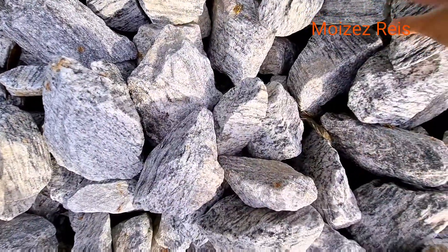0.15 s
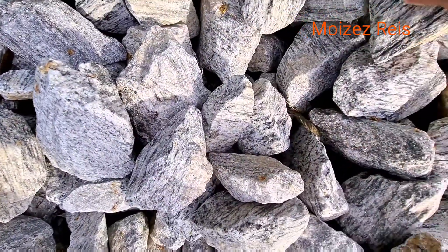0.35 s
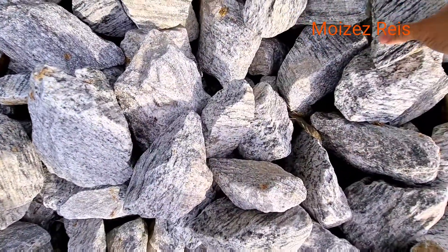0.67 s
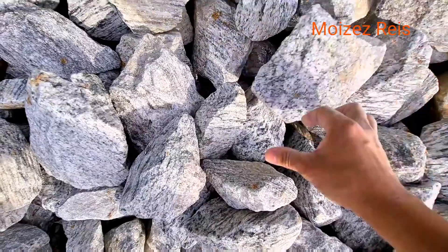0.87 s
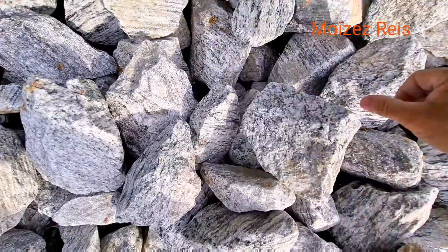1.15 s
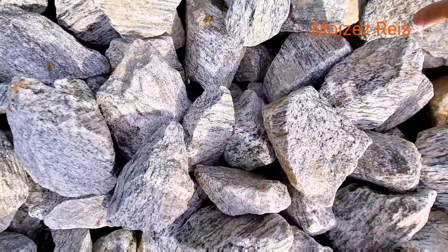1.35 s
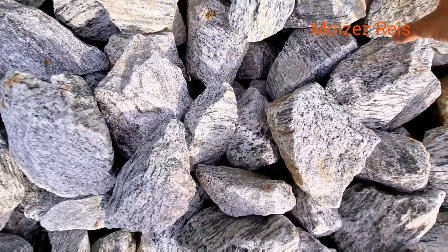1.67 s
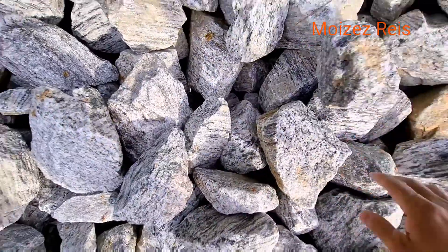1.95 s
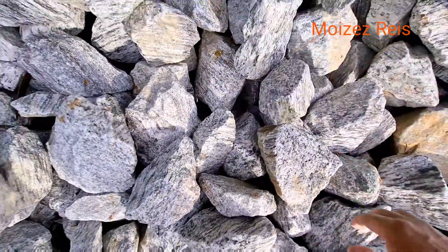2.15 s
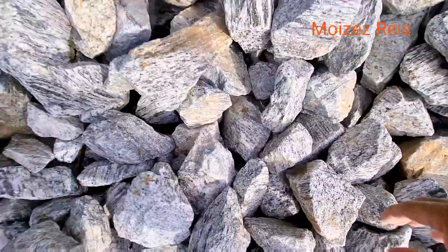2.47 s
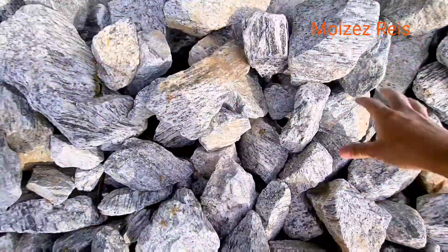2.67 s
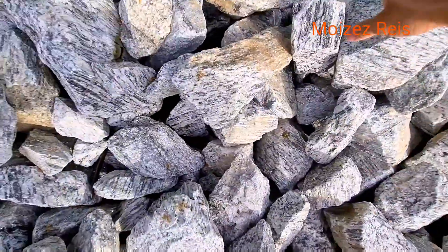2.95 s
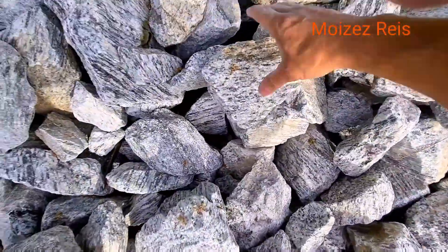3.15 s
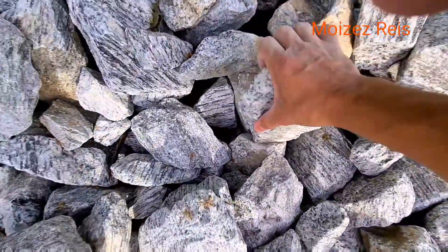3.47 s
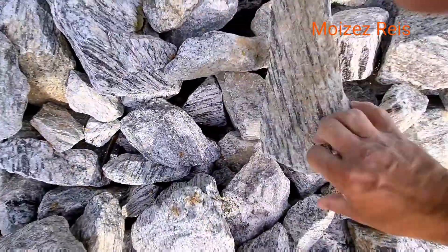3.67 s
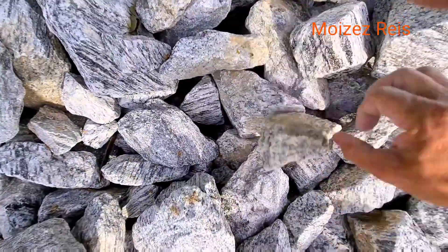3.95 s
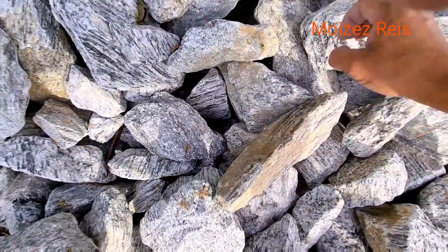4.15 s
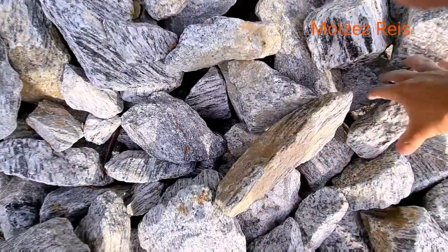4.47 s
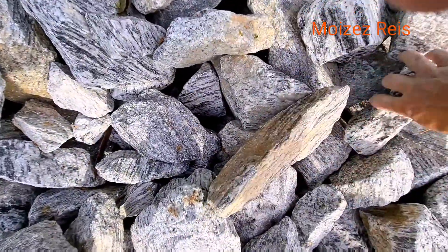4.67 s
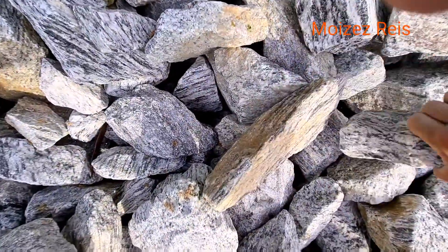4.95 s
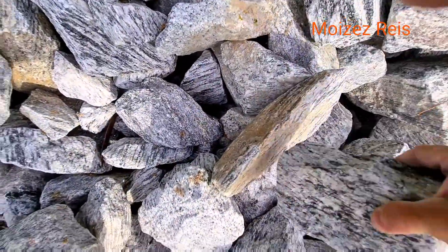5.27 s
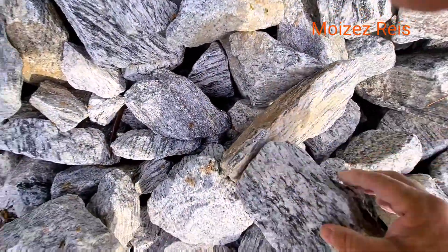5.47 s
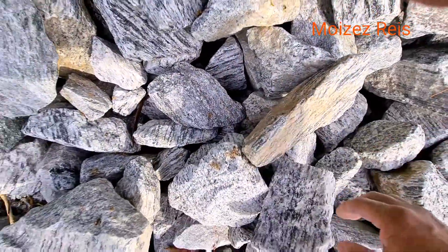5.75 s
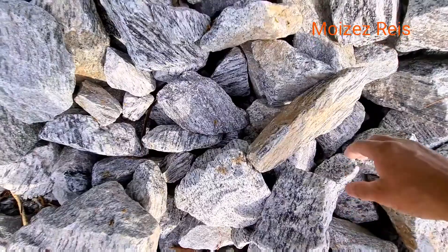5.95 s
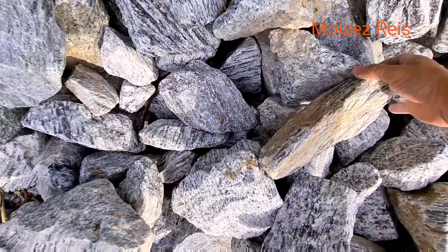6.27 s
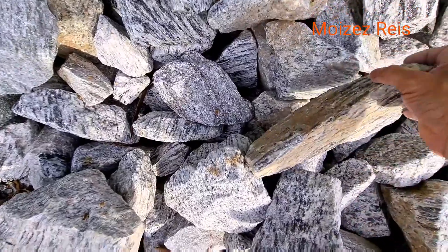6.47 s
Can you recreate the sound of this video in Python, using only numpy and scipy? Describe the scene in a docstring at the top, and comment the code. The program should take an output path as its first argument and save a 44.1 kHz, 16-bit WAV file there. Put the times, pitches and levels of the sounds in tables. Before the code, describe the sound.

Rough stones knock, clink and scrape against each other in irregular bursts as they are handled on a heap outdoors.

```python
"""Outdoors at a stone heap, close under a phone: hands turn and drop rough building stones.
Each blow is a short contact pulse with chatter after it. Sliding faces grind and grit crackles.
The handled stone rings in its own high modes; the heap adds hollow resonances and a low thump.
Light wind rumble, a faint insect band and a far dove fill the pauses."""
import sys
import numpy as np
from scipy import signal
from scipy.fft import rfft, irfft, next_fast_len
from scipy.io import wavfile
from scipy.ndimage import uniform_filter1d

SR = 44100
rng = np.random.default_rng(int(sys.argv[2]) if len(sys.argv) > 2 else 0)


def generate_wav(sig):
    """Save sig (samples, or channels by samples) to the path in sys.argv[1] as 16-bit PCM at SR."""
    pcm = np.round(np.clip(np.atleast_2d(sig).T, -1, 1) * 32767).astype(np.int16)
    wavfile.write(sys.argv[1], SR, pcm)


N = 291501
TIME_S = np.arange(N) / SR

# start_s, level_db, pitch_hz, crack_re_level_db, chatter_t60_s
BLOWS = [(0.837, 1, 858, -20.5, 0.05), (0.876, -12.5, 690, -0.5, 0.077), (0.914, 0.5, 1190, -22, 0.098),
         (0.929, -2.5, 1260, -22, 0.0073), (0.937, -4, 1310, -20, 0.0084), (0.954, -16.5, 630, -8, 0.088),
         (1.034, -17, 910, -6.5, 0.05), (1.07, -14.5, 696, -15, 0.078), (1.115, -7.5, 1320, -17, 0.08),
         (1.187, -26, 606, -14, 0.25), (1.275, -1.5, 1060, -32, 0.041), (1.315, -7.5, 697, -15, 0.087),
         (1.894, -16, 794, -8.5, 0.061), (1.904, -9, 1370, -57, 0.071), (2.014, -7.5, 1280, -18, 0.08),
         (2.026, -5.5, 1150, -21, 0.026), (2.065, 1, 1460, -16, 0.049), (2.096, -14, 1040, -12.5, 0.062),
         (2.17, -2.5, 933, -20.5, 0.037), (2.186, -6.5, 1180, -15.5, 0.034),
         (2.234, -14, 850, -12.5, 0.034), (2.325, -21, 626, -29, 0.05), (2.359, -0.5, 1283, -18.5, 0.06),
         (2.366, -6.5, 890, -55.5, 0.04), (2.378, -16, 1240, -6, 0.11), (2.449, -37.5, 603, 24, 0.015),
         (2.463, -31.5, 834, 16.5, 0.011), (2.498, -30, 1390, 9, 0.03), (2.519, -12, 1100, -25, 0.028),
         (2.558, -9.5, 1292, -20.5, 0.04), (2.58, 0, 1030, -35, 0.03), (2.596, -4, 1520, -36.5, 0.034),
         (2.732, -34.5, 860, 5.5, 0.26), (2.82, -13, 800, -26, 0.057), (2.845, -15, 1520, -43, 0.054),
         (3.239, -57, 1400, 17, 0.03), (3.435, -33, 1460, -1, 0.042), (3.532, -0.5, 1260, -26.5, 0.03),
         (3.653, -13.5, 695, -21, 0.038), (3.69, -7.5, 1150, -19, 0.056), (3.746, -25, 463, -1, 0.1),
         (3.793, -11, 800, -23, 0.054), (3.818, -19, 790, -19, 0.03), (3.871, -3, 770, -17.5, 0.047),
         (3.963, -12.5, 1310, -12, 0.061), (3.997, -5, 820, -14, 0.049), (4.018, -8.5, 676, -51.5, 0.066),
         (4.071, -18, 750, -13.5, 0.04), (4.083, -5, 1317, -34.5, 0.038), (4.2, -13.5, 874, -11.5, 0.021),
         (4.206, -12, 1260, -22, 0.054), (4.857, -20, 805, 3.5, 0.058), (4.961, 0.5, 1490, -50, 0.02),
         (4.991, -11.5, 1390, -54, 0.02), (5.03, -13.5, 1510, -41, 0.058), (5.095, -20, 740, -37, 0.014),
         (5.181, -25, 650, -15, 0.11), (5.396, -6.5, 1300, -22.5, 0.051), (5.443, -25, 890, 2.5, 0.031),
         (5.478, -20.5, 796, -8.5, 0.097), (5.556, 0, 1460, -27.5, 0.038), (5.595, -5, 1060, -52, 0.014),
         (5.601, 0, 1155, -37, 0.017), (5.646, -8, 1270, -35, 0.022), (5.663, -18, 1120, -12.5, 0.032),
         (5.72, -8.5, 1125, -18, 0.051), (5.73, -15, 1425, -15.5, 0.1), (5.925, -30, 990, -18, 0.022),
         (6.076, -22.5, 1406, -3, 0.061), (6.395, -57.5, 888, 10, 0.022)]


def blows():
    """Stone hits stone. Returns knocks, plus the cracks and strikes that drive the ringing."""
    size, peak_s = int(.25 * SR), .0018
    t = np.arange(size) / SR
    knocks = np.zeros((2, N + size))
    cracks, strikes, shake = np.zeros((3, N + size))
    chatter = pair(clicks(3200, 1.1), clicks(1800, 2.2), 0.52)
    heap_chatter = hollows(chatter)
    heap_chatter /= np.std(heap_chatter)
    for start_s, db, hz, crack_db, t60 in BLOWS:
        i, t60 = int(start_s * SR), max(t60, .01)
        j = i % (N - size)
        # contact pushes and lets go within a few cycles
        phase = 2 * np.pi * hz * (t - peak_s)
        window = np.exp(-((t - peak_s) * hz / 0.75) ** 2 * np.where(t > peak_s, .4, 1))
        pulse = -(np.cos(phase) + 0.17 * np.cos(2 * phase)) * window
        # rebounds sound in the hollow under the blow and in the whole heap
        local = undb(-5.5) * ring(chatter[:, j:j + size], hz, 0.035)
        broad = undb(-4.5) * band(heap_chatter[:, j:j + size], .5 * hz, 4600, order=1)
        rebounds = (local + broad) * (1 - np.exp(-t / 0.0012)) * undb(-60 * t / t60)
        knocks[:, i:i + size] += undb(db) * (pulse + rebounds)
        shake[i:i + size] += undb(db - 25.5 - 60 * t / 0.017)
        crack_decay = undb(-60 * t / 0.016) + undb(-14 - 60 * t / (0.81 * t60))
        cracks[i:i + size] += undb(db + crack_db) * (1 - np.exp(-t / 0.0015)) * crack_decay
        strikes[i + int(peak_s * SR)] += undb(db + crack_db)
    low = thump(shake[:N] * rng.standard_normal(N))
    return band(knocks[:, :N], 290, 6000) + low, cracks[:N], strikes[:N]


def snap(cracks):
    """The first instants of a blow radiate as bare bright noise."""
    onsets = np.maximum(cracks - uniform_filter1d(cracks, size=600), 0)
    return undb(-3) * band(onsets * pair(*rng.standard_normal((2, N)), .7), 2200, 16500)


# full_contact_s, hold_s, grind_db, grit_db, rumble_db
SCRAPES = [(0.056, 0.0034, -46, -45.5, -39.5), (0.186, 0.046, -48, -48.5, -48),
           (0.325, 0.0077, -56.5, -56.5, -51.5), (0.456, 0.027, -55, -57, -57),
           (0.717, 0.026, -48.5, -43, -58), (0.765, 0.04, -37, -44, -32.5),
           (0.866, 0.18, -40.5, -45.5, -34), (1.081, 0.066, -66, -43, -36.5),
           (1.206, 0.15, -47.5, -47.5, -36.5), (1.736, 0.04, -46.5, -52, -42.5),
           (1.837, 0.29, -54, -58.5, -40.5), (2.174, 0.23, -49.5, -53.5, -38.5),
           (2.469, 0.035, -35.5, -27.5, -42), (2.531, 0.058, -14.5, -30, -38.5),
           (2.607, 0.0141, -44.5, -34.5, -32.5), (2.756, 0.15, -36.5, -35, -37.5),
           (3.35, 0.087, -49, -57, -59), (3.446, 0.22, -39.5, -43.5, -43),
           (3.687, 0.0098, -32, -30.5, -23.5), (3.823, 0.029, -31.5, -38.5, -37),
           (3.886, 0.049, -32, -44.5, -29), (4.011, 0.066, -34, -43, -36),
           (4.203, 0.023, -48, -47.5, -37.5), (4.731, 0.013, -62, -67.5, -64),
           (4.833, 0.019, -41, -37, -38.5), (4.918, 0.17, -38, -43, -40.5),
           (5.251, 0.054, -74, -67.5, -48.5), (5.447, 0.03, -34, -47, -38),
           (5.565, 0.11, -35.5, -44.5, -46), (5.718, 0.15, -47.5, -50, -46.5),
           (5.942, 0.034, -54.5, -61, -52), (6.09, 0.051, -54, -55, -51), (6.413, 0.019, -61, -60.5, -70),
           (6.535, 0.044, -45, -48.5, -50.5)]
RISE_DB_PER_S, FALL_DB_PER_S = (392, 396.5, 302), (306.5, 297, 251.5)  # grind, grit, rumble


def scrapes():
    """Faces catch and slip. Returns grinding with the rumble of shifting stones, and the grit envelope."""
    power = np.zeros((3, N))
    for contact_s, hold_s, *db in SCRAPES:
        before_db = np.outer(RISE_DB_PER_S, np.maximum(contact_s - TIME_S, 0))
        after_db = np.outer(FALL_DB_PER_S, np.maximum(TIME_S - contact_s - hold_s, 0))
        power += undb(np.array(db)[:, None] - before_db - after_db) ** 2
    grind, grit, rumble = np.sqrt(power)
    slip = unit(undb(1.71 * drift(45)))
    body = pair(unit(hollows(clicks(1600, 0.83))), unit(hollows(clicks(1000, 1.4))), 0.38)
    breaking_edges = np.array([clicks(1500, 1.9), clicks(1500, 1.6)])
    body += undb(-14.5) * unit(band(breaking_edges, 1500, 3600))
    low = pair(*unit(thump(rng.standard_normal((2, N)))), 0.055)
    rumble *= unit(undb(3.6 * drift(25)))
    grit *= unit(slip * undb(2 * drift(60)))
    return slip * grind * body + rumble * low, grit


# modes of three stones: pitch_hz, level_db
BLOCK = [(2490, -13.5), (5730, -9), (5990, 2), (6520, -4), (6740, 5.5), (8410, -9)]
CHUNK = [(2730, -7.5), (4120, -4.5), (5400, 4), (5560, -4), (7300, 2), (8170, -12)]
SLAB = [(3280, 8.5), (3889, -2), (4230, -3), (4970, -12), (5660, -13.5), (7040, -6), (7260, -5.5),
        (7600, -10.5), (8170, -20), (3330, 9.5)]  # laid down, its lowest mode moves from the first row to the last
# stone in hand (pinning the slab mutes its lowest modes): modes, start_s
TOUCHES = [(CHUNK, 0), (BLOCK, .7), (CHUNK, 2.42), (SLAB[:-1], 3.36), (SLAB[2:-1], 3.58), (SLAB[:-1], 3.81),
           (CHUNK, 4.5), (SLAB[1:], 5.39), (SLAB[3:-1], 5.54), (SLAB[1:4], 6.39), (CHUNK, 6.48)]
# per touch (a firm grip damps the ring): ring_db, left_lag_ms
GRIPS = [(-31, 0.23), (-5, 0.1), (-11, -0.13), (5, -0.16), (1, -0.16), (5.5, -0.19), (-4, 0.21),
         (5.5, 0.097), (4.5, 0.12), (12.5, 0.089), (-7, 0.13)]
RING_T60_S, SPOT_DB = 0.12, 3.6


def handled_stone(cracks, strikes, grit, touch_index):
    """Blows shake the held stone's modes, grit only grazes them; the next grip stops the ring."""
    out = np.zeros((2, N))
    for k, ((modes, _), (ring_db, _)) in enumerate(zip(TOUCHES, GRIPS)):
        drive = undb(7.5) * strikes + undb(-3) * cracks * rng.standard_normal(N) + undb(-4) * grit
        drive *= touch_index == k
        first, last = np.flatnonzero(touch_index == k)[[0, -1]]
        span = slice(first, last + SR // 10)
        damping = undb(-60 * np.maximum(TIME_S[span] - last / SR, 0) / 0.04)
        for hz, mode_db in modes:
            spot = drift(16)  # the struck spot favours a mode; each mic hears another side
            sides = undb(SPOT_DB * np.array([spot, spot[::-1]])[:, span])
            t60 = RING_T60_S * (3300 / hz) ** (0.99 * np.sign(hz - 3000))  # longest near 3 kHz
            tone = undb(ring_db + mode_db) * damping * ring(drive[span] * sides, hz, t60)
            tone[0] = np.roll(tone[0], round(SR / hz / 4))  # left lags a quarter cycle
            out[:, span] += tone
    return out


# spectrum of the crackle: freq_hz, level_db
CRACKLE_SPECTRUM = [(2000, -18.5), (2800, -1), (4000, -5), (6000, 6), (8500, -2.5), (12000, -2),
                    (13500, -22)]


def crackle(envelope, chips):
    """Many stones ring briefly as contacts wander over them."""
    drive = pair(*(envelope * chips), 0.98)
    freq_hz, level_db = np.transpose(CRACKLE_SPECTRUM)
    out = 0
    for hz in np.geomspace(2100, 13200, num=40) * undb(0.16 * rng.standard_normal(40)):
        mode_db = np.interp(np.log(hz), np.log(freq_hz), level_db)
        contact = undb(mode_db + 7.5 * np.clip(drift(22), -3, 2.1))
        out += np.sqrt(hz / 6000) * ring(contact * drive, hz, t60=230 / hz)
    return undb(-23) * out


# gaps between stones: centre_hz, width_hz, gain_db
HOLLOWS = [(320, 92, -1.5), (658, 230, 1), (807, 99.5, 4), (1260, 396, -1.5), (1563, 397, -1),
           (2280, 2700, -27.5)]


def hollows(x):
    """The heap's hollows colour knocks and scrapes."""
    return sum((-1) ** k * undb(db) * band(x, hz - width / 2, hz + width / 2, order=1)
               for k, (hz, width, db) in enumerate(HOLLOWS))


# low heap modes: pitch_hz, gain_db, t60_s
HEAP_MODES = [(84, -9, 0.3), (160, -15.5, 0.11), (222, 1.5, 0.029), (333, -1, 0.017)]


def thump(x):
    """The heap shakes as a whole."""
    return sum(undb(db) * band(ring(x, hz, t60), 65, 600) for hz, db, t60 in HEAP_MODES)


# wind spectrum: freq_hz, level_db
WIND_SPECTRUM = [(15, -21), (25, -4.5), (76, -9.5), (150, -30.5),
                 (600, -29), (2000, -38), (4000, -32.5), (14000, -41)]


def wind(level_db=-63.5):
    """Light wind: steady rumble and hiss."""
    noise = pair(*rng.standard_normal((2, N)), 0.97)
    return undb(level_db) * unit(colour(noise, WIND_SPECTRUM))


def insects(centre_hz=7200, width_hz=340, level_db=-68):
    """A narrow band of insect hiss that throbs irregularly."""
    throb = uniform_filter1d(np.abs(clicks(900, .8)), size=400)
    hiss = band(rng.standard_normal((2, N)), centre_hz - width_hz / 2, centre_hz + width_hz / 2)
    return undb(level_db) * unit(hiss * throb)


# start_s, end_s, pitch_hz, relative_db
COOS = [(1.409, 1.581, 557, -79), (4.305, 4.56, 565, -77)]


def dove():
    """Two far coos, each a pure tone arching in pitch and level."""
    out = np.zeros(N)
    for start_s, end_s, hz, db in COOS:
        arc = np.sin(np.pi * np.clip((TIME_S - start_s) / (end_s - start_s), 0, 1))
        phase = 2 * np.pi * np.cumsum(hz * (1 + 0.033 * arc)) / SR
        out += undb(db + 10) * arc ** .5 * np.sin(phase)
    return out


def undb(db):
    return 10 ** (np.asarray(db) / 20)


def unit(x):
    return x / np.sqrt(np.mean(x ** 2))


def band(x, lo_hz, hi_hz, order=2):
    return signal.sosfilt(signal.butter(order, [lo_hz, hi_hz], "band", fs=SR, output="sos"), x)


def colour(x, points):
    """Shapes the spectrum by (freq_hz, level_db) points."""
    hz, db = np.transpose(points)
    size = next_fast_len(N)
    bin_hz = np.maximum(np.arange(size // 2 + 1) * SR / size, 1)
    gain = undb(np.interp(np.log(bin_hz), np.log(hz), db))
    return irfft(rfft(x, size) * gain, size)[..., :N]


def ring(x, hz, t60):
    """One mode; unity power gain for white noise."""
    r, angle = np.exp(-np.log(1000) / (t60 * SR)), 2 * np.pi * hz / SR
    gain = np.sqrt(2 * (1 - r * r)) * np.sin(angle)
    return gain * signal.lfilter([1], [1, -2 * r * np.cos(angle), r * r], x)


def clicks(rate_hz, spread_db):
    """Random clicks of uneven size; rms 1."""
    hit = rng.random(N) < rate_hz / SR
    return unit(hit * rng.standard_normal(N) * undb(spread_db * rng.exponential(size=N)))


def drift(rate_hz):
    """Random levels joined by straight lines."""
    levels = rng.standard_normal(int(N / SR * rate_hz) + 2)
    return 1.738 * np.interp(TIME_S * rate_hz, np.arange(len(levels)), levels)


def pair(mid, side, width):
    """Mid and side to left and right."""
    return np.array([mid + width * side, mid - width * side]) / np.sqrt(1 + width ** 2)


def scene():
    """Knocks, scrapes and ringing stones over wind, insects and dove."""
    knocks, cracks, strikes = blows()
    grinding, grit = scrapes()
    touch_index = np.searchsorted([s for _, s in TOUCHES], TIME_S, side="right") - 1
    stones = knocks + grinding
    # long waves reach both mics alike
    stones += np.array([[-1], [1]]) * band(stones[0] - stones[1], 40, 650, order=1) / 2
    # left is early or late by where the hands work
    _, left_lag_ms = np.transpose(GRIPS)[:, touch_index]
    stones[0] = np.interp(TIME_S - left_lag_ms / 1000, TIME_S, stones[0])
    chips = np.array([clicks(3500, 2.3), clicks(3500, 2.3)])
    stones += crackle(cracks + grit, chips) + snap(cracks)
    stones += handled_stone(cracks, strikes, grit * chips[0], touch_index)
    return stones + wind() + insects() + dove()


def record(dry, top_hz=13100):
    """The phone thins deep bass, lifts the right treble, rounds peaks and cuts the top."""
    x = signal.sosfilt(signal.butter(2, 36, "high", fs=SR, output="sos"), dry)
    x[1] += 0.35 * band(x[1], 8200, 14000)
    x = 1.254 * np.tanh(x / 1.462)
    lowpass = signal.ellip(8, .2, 70, top_hz, fs=SR, output="sos")
    return np.clip(signal.sosfilt(lowpass, x), -1, 1)


dry = scene()
out = record(dry)
generate_wav(out)
```